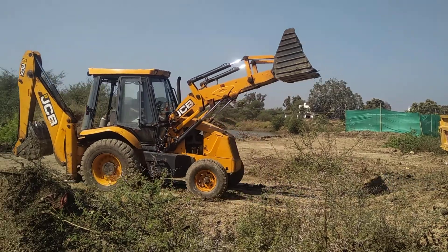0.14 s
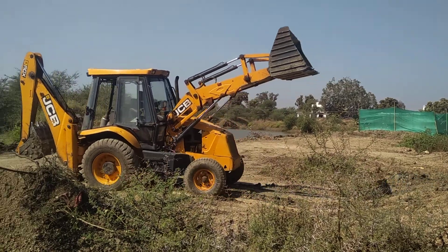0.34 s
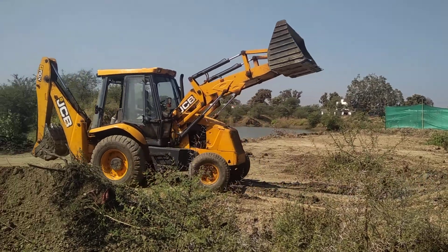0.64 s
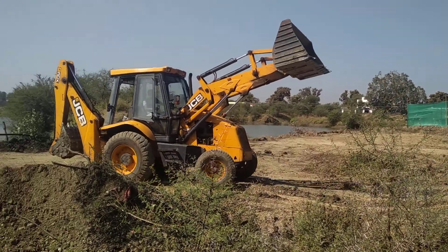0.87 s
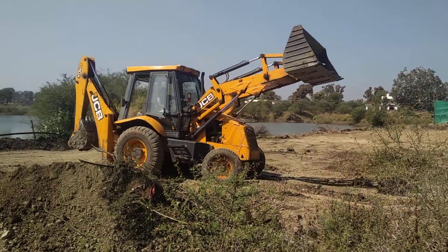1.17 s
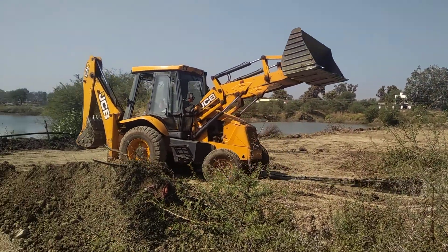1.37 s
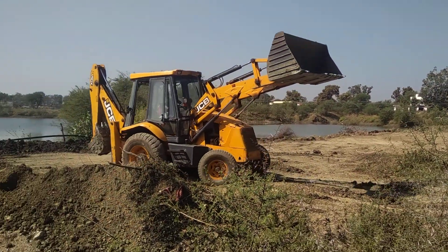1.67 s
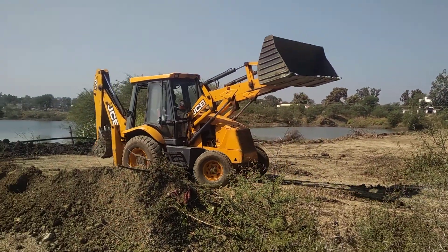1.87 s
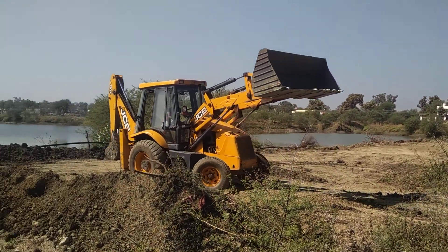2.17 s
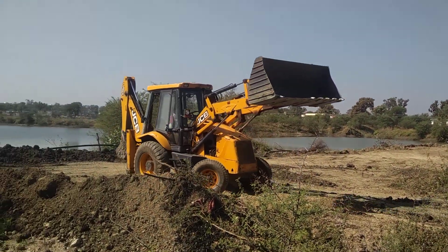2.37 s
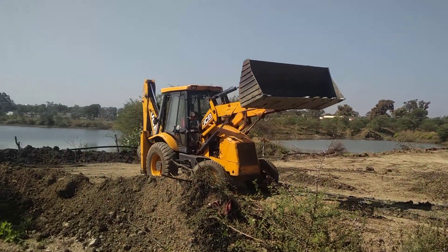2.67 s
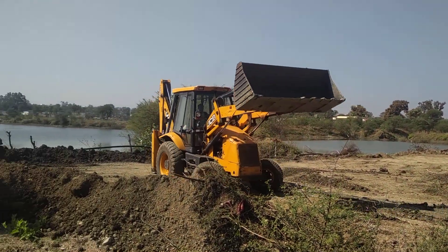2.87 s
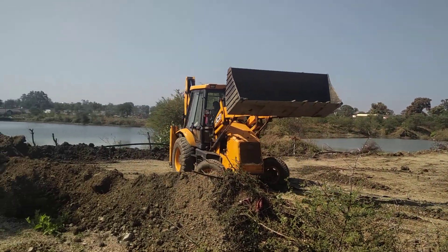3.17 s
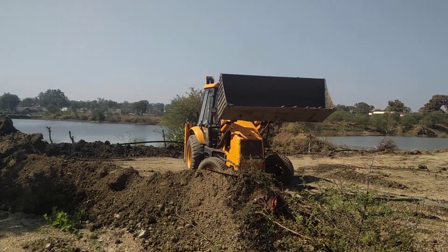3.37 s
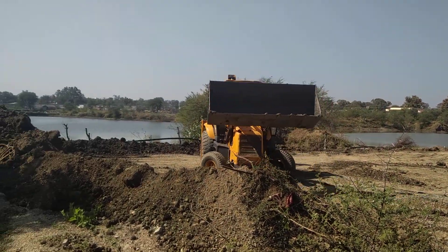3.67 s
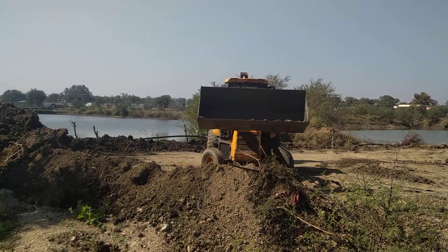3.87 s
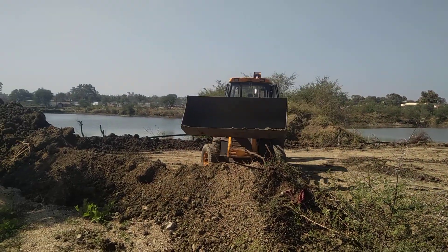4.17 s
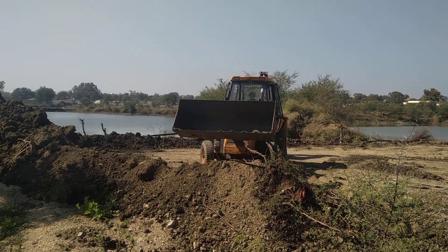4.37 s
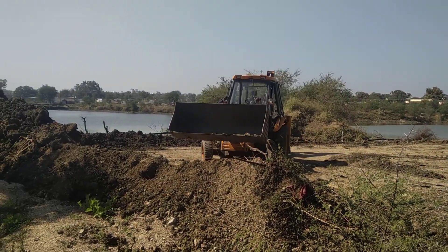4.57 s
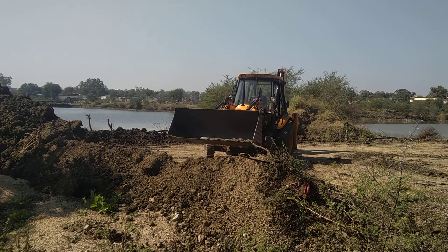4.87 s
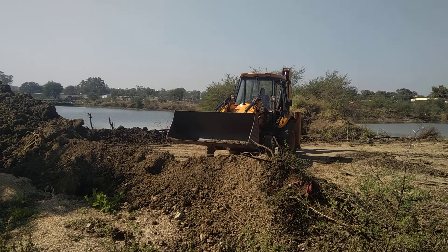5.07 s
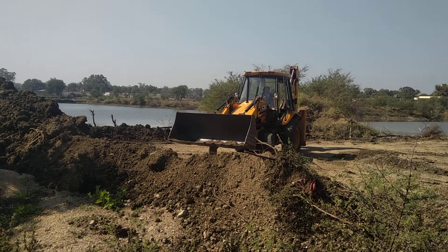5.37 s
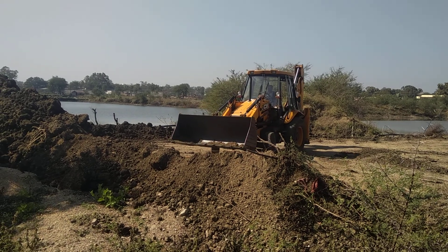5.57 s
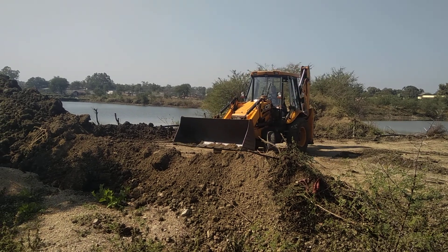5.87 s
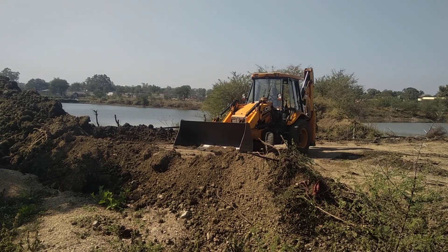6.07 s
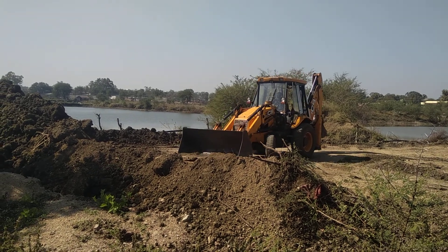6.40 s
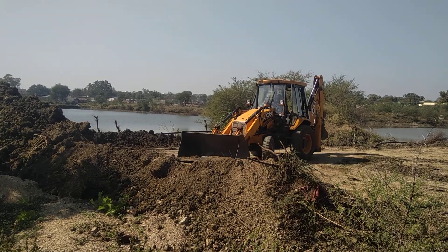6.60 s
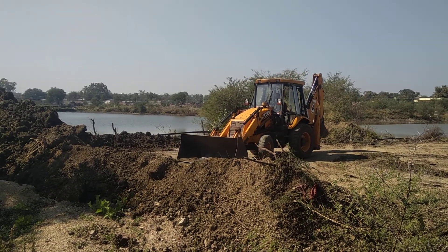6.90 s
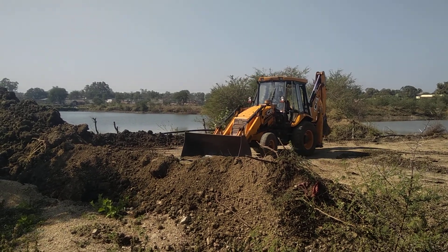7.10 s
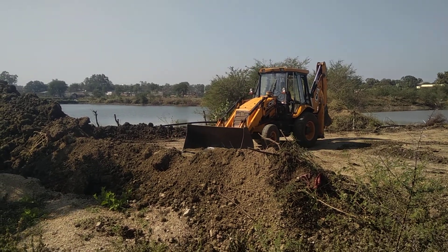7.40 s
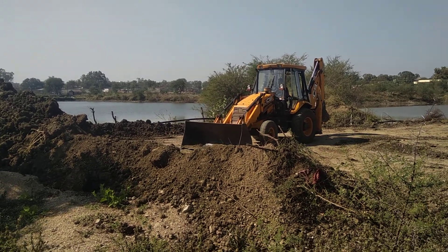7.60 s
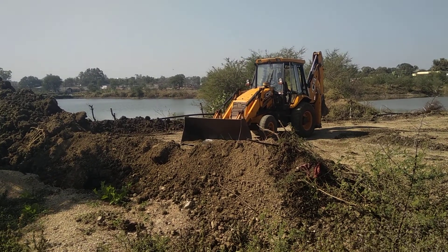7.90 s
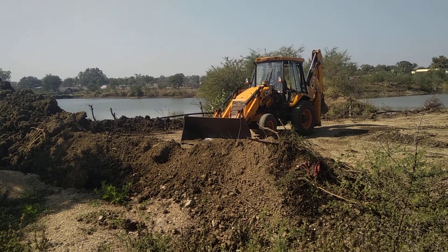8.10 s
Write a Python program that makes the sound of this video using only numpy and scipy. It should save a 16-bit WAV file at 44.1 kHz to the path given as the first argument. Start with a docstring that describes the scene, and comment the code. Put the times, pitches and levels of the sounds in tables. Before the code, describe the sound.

Outdoors, gusts buffet both sides of a stereo microphone while a diesel loader works with a low exhaust hum and rattling knock. A light gear whine falls in pitch and the arm joints clank. The engine rises in one short, harder rev, then slows and settles into a softer throbbing idle, with faint ticks and a quick cluster of clanks near the end.

```python
"""Diesel loader turning away

A four-cylinder loader on open ground works at middle speed, revs once, then sinks to idle.
Exhaust orders and the cooling fan hum below; each firing knocks through block and panels.
Hard firings crack in the treble during the rev; faint ticks follow later.
The drive gear whines briefly and the linkage clanks.
Wind buffets the two microphone ports, each on its own."""
import sys
import numpy as np
from scipy import signal
from scipy.fft import rfft, irfft
from scipy.io import wavfile

SR = 44100
rng = np.random.default_rng(int(sys.argv[2]) if len(sys.argv) > 2 else 0)


def file_out(sig):
    """Save sig as 16-bit WAV at sys.argv[1]."""
    # one column per channel
    cols = np.atleast_2d(sig).T
    # limit, then scale
    lim = np.clip(cols, -1, 1)
    pcm = np.round(lim * 32767).astype(np.int16)
    wavfile.write(sys.argv[1], SR, pcm)


N = 363825

# engine level with load and distance: t/s, knock/dB, exhaust over knock/dB
ENGINE_LEVEL = [(0, -23.5, -2.5), (.5, -25, -3), (1.2, -24, -2.5), (1.7, -24, -0.5), (2.53, -23.5, -1.5),
                (2.64, -20, 0.5), (3.0, -21.5, 1), (3.3, -23, 2.5), (3.68, -26.5, 0.5), (3.82, -28.5, -1.5),
                (4.25, -30.5, -2.5), (4.78, -36, -2.5), (5.5, -35, -2), (6.1, -36.5, -2), (7.0, -34.5, -5),
                (7.55, -35, -4.5), (7.85, -37.5, -10), (8.25, -36, -6)]
# below pipe resonance the first order runs ahead: firing rate/Hz, its lead/cycles, knock lead/cycles
PHASE_LEAD = [(29, .5, .27), (34, .36, .29), (38, .17, .31), (43.5, 0, .33)]
# engine tone by stage (working, throttle bite, rev, idle), changing with load and facing: t/s, stage 0-6
TONE_STAGE = [(0, 0), (.35, 0), (.65, 1), (1.65, 1), (1.9, 2), (2.5, 2), (2.63, 3), (2.8, 3), (2.92, 4),
              (3.5, 4), (4.1, 5), (5.3, 5), (6.2, 6), (8.25, 6)]


def amp(db):
    """dB to gain."""
    return 10 ** (np.asarray(db) / 20)


def unit(x):
    """Scale to rms 1."""
    return x / np.sqrt(np.mean(x ** 2) + 1e-20)


def in_time(rows):
    """Columns of a time table, one value per sample."""
    t_s, *columns = np.transpose(rows)
    return [np.interp(np.arange(N) / SR, t_s, c) for c in columns]


def at_hz(points, hz):
    """Read a table on a log-frequency axis."""
    f_hz, values = np.transpose(points)
    return np.interp(np.log(hz), np.log(np.maximum(f_hz, 1)), values)


def drift(rate_hz):
    """Slow random wander, spread about 1."""
    knots = rng.standard_normal(400)
    return 1.2 * np.interp(np.arange(N) / SR * rate_hz * 2, np.arange(400), knots)


def tone(cycles, rms_db):
    """Sine from a phase in cycles."""
    return np.sqrt(2) * amp(rms_db) * np.sin(2 * np.pi * cycles)


def place(out, burst, t_s, peak_db):
    """Add a stereo burst at a given peak level."""
    i = round(t_s * SR)
    out[:, i:i + burst.shape[1]] += amp(peak_db) * burst / np.abs(burst).max()


def resonate(excite, modes):
    """Parallel resonances (f/Hz, width/Hz, level/dB), each driven by excite(f); rms 1."""
    out = 0
    for hz, width_hz, db in modes:
        r = np.exp(-np.pi * width_hz / SR)
        gain = (1 - r * r) / 2
        section = [gain, 0, -gain, 1, -2 * r * np.cos(2 * np.pi * hz / SR), r * r]
        out = out + amp(db) * signal.sosfilt([section, section], excite(hz))
    return unit(out)


def port_noise(hz):
    """White noise at two ports, as alike as they are at this pitch."""
    # f/Hz, left-right correlation
    likeness = [(60, 1), (150, 1), (380, 0.99), (950, 0.51), (2380, 0.47), (5980, 0.15), (15000, 0.065)]
    mid, side = rng.standard_normal((2, N))
    alike = at_hz(likeness, hz)
    return np.sqrt(1 + alike) * mid + np.sqrt(1 - alike) * side * [[1], [-1]]


def bands(spectrum, gate):
    """Half-octave noise bands, each gated before its filter; rms 1."""
    low_hz, high_hz = spectrum[0][0], spectrum[-1][0]
    edges_hz = np.geomspace(low_hz, high_hz, int(2 * np.log2(high_hz / low_hz)) + 2)
    out = 0
    for a, b in zip(edges_hz, edges_hz[1:]):
        hz = np.sqrt(a * b)
        band = signal.butter(2, [a, b], "band", fs=SR, output="sos")
        out = out + amp(at_hz(spectrum, hz)) * signal.sosfilt(band, port_noise(hz) * gate())
    return unit(out)


def stage_db(source):
    """Level offset of one source, changing with load and facing."""
    # row per stage: fan/dB, rattle/dB, roar/dB, upper exhaust orders/dB, timing gear/dB
    offsets = [(-6.5, -7.5, -3, 0.5, -15), (-6.5, -7, -5, -4.5, -18), (-13, -8, -3.5, -0.5, -14.5),
               (-34, -9, -4, -0.5, -20), (-18.5, -8, -1, -9, -29), (-7.5, -13.5, -3.5, -8, -42),
               (-3.5, -8.5, -6.5, -3, -29)]
    column = ["fan", "rattle", "roar", "upper orders", "timing gear"].index(source)
    (stage,) = in_time(TONE_STAGE)
    return np.interp(stage, np.arange(len(offsets)), np.array(offsets)[:, column])


def wind(flutters=58, gust_s=.05):
    """Lumpy rumble, its own at each port, and short buffets that hit one port."""
    # t/s, level/dB
    rumble_level = [(0, -32), (1, -30.5), (1.9, -42.5), (2.7, -22), (4, -40.5), (5.5, -40.5), (7.5, -29.5),
                    (7.85, -38), (8.25, -32.5)]
    # strong buffets: t/s, level/dB, top f/Hz, port (0 left, 1 right)
    gusts = [(0.215, -13, 64, 1), (0.52, -19, 139, 1), (0.865, -10, 71, 1), (1.08, -9, 110, 1),
             (1.556, -15, 215, 1), (1.675, -11, 88.4, 1), (5.199, -21.5, 120, 0), (5.928, -16.5, 270, 0),
             (6.153, -21, 89, 0), (6.24, -22, 204, 0), (6.35, -16.5, 211, 0), (6.429, -17.5, 150, 1),
             (6.52, -17, 150, 1), (6.811, -15, 128, 1), (7.136, -11.5, 71.3, 1), (7.221, -27, 422, 1),
             (7.26, -19.5, 305, 1), (7.348, -13, 334, 0), (7.373, -20.5, 413, 0), (7.634, -20, 179, 0),
             (7.67, -15.5, 73, 0), (7.737, -14, 76, 0), (7.971, -19, 190, 0), (8.112, -17.5, 217, 0),
             (8.167, -24, 170, 1)]
    low = np.r_[signal.butter(1, [14, 80], "band", fs=SR, output="sos"),
                signal.butter(2, 260, fs=SR, output="sos")]
    out = unit(signal.sosfilt(low, rng.standard_normal((2, N + 9000)))[:, 9000:])
    (rumble_db,) = in_time(rumble_level)
    out *= amp(rumble_db + 4.85 * np.array([drift(8.3), drift(6.8)]))
    small = [(when * N / SR, rumble_db[int(when * N)] + 4 + 8 * force, 150 * (.194 + pitch), port)
             for when, force, pitch, port in rng.random((flutters, 4))]
    for t_s, db, top_hz, port in gusts + small:
        band = signal.butter(2, [max(.25 * top_hz, 15), max(top_hz, 30)], "band", fs=SR, output="sos")
        n = round(gust_s * SR * min(150 / top_hz, 1) ** .85)   # brighter is shorter
        puff = unit(signal.sosfilt(band, rng.standard_normal(9000))[-n:]) * np.hanning(n)
        i = max(round(t_s * SR) - n // 2, 0)
        out[int(round(port)), i:i + n] += amp(db) * puff[:N - i]
    return out


def drive_gear(play_cycles=.3):
    """The gear whines with travel speed; tooth play wobbles its phase."""
    # backing round, then creeping forward: t/s, f/Hz, level/dB
    whine = [(0, 441, -36), (.25, 460, -41), (.55, 440, -39), (.75, 418, -33), (.9, 432, -48),
             (1.1, 437, -41), (1.5, 299, -38), (1.75, 287, -41), (1.9, 290, -63), (4.7, 303, -53),
             (4.85, 306, -50.5), (5.25, 257.3, -45.5), (5.8, 252, -49), (5.95, 250, -61)]
    hz, db = in_time(whine)
    return tone(np.cumsum(hz) / SR + play_cycles * drift(15), db + 2 * drift(22))


def linkage(hit_db=6):
    """Pins knock in their bores: a blow, then ragged ringing noise."""
    # t/s, peak/dB, centre f/Hz, treble/dB, t60/s
    clanks = [(0.298, -11, 1140, -8, 0.27), (1.264, -12, 1130, -19, 0.041), (2.645, -11, 337, -22, 0.23),
              (3.943, -16.5, 1110, -22, 0.13), (3.994, -19, 1230, -12, 0.096),
              (6.9361, -11.5, 2360, -15.5, 0.16), (6.943, -14, 2270, -12, 0.39),
              (6.988, -17.5, 1280, -10, 0.16), (7.01, -35, 970, -3, 0.081)]
    out = np.zeros((2, N))
    t = np.arange(round(.2 * SR)) / SR
    hit = np.minimum(t / .00026, 1) * (1 + amp(hit_db) * np.exp(-t / .0015))
    for t_s, db, centre_hz, treble_db, t60_s in clanks:
        dying = hit * amp(-60 * t / max(t60_s, .005))
        excite = lambda hz: (rng.standard_normal(len(t)) + .5 * rng.standard_normal((2, len(t)))) * dying
        modes = [(centre_hz, 750, 0), (300, 300, -3), (800, 500, -7),
                 (3500, 900, treble_db + 3), (5000, 2500, treble_db - 7)]
        place(out, resonate(excite, modes), t_s, db)
    return out


def cracks_and_ticks():
    """Hard firings crack in the treble during the rev; faint ticks follow later."""
    # t/s, peak/dB
    peaks = [(2.6516, -16), (2.675, -14), (2.828, -13), (2.99, -10), (3.0106, -9), (3.033, -15),
             (3.153, -14.5), (4.2805, -27), (4.335, -26.5), (4.3444, -35), (4.5094, -36), (4.5659, -37),
             (4.6508, -36), (7.347, -30.5), (7.3896, -32), (8.0994, -36)]
    out = np.zeros((2, N))
    t = np.arange(1500) / SR
    bright = signal.butter(2, [6500, 12500], "band", fs=SR, output="sos")
    shape = amp(-60 * t / .017) * np.minimum(t / .013, 1)
    for t_s, db in peaks:
        place(out, signal.sosfilt(bright, rng.standard_normal((2, len(t))) * shape), t_s, db)
    return out


def exhaust(firing_hz, cycles, throb_db=4, idle_odd_db=-6.5):
    """Eight orders in step: a slow rise and sharp drop per firing, uneven at idle."""
    # tail pipe over the ground: f/Hz, gain/dB
    pipe = [(24, 9.5), (36, 10), (48, 9), (56, 7.5), (78, -3.5), (96, 1.5), (125, -3), (147, -8),
            (174, -13), (188, -4.5), (215, -6), (226, -14.5), (290, -24.5), (350, -22)]
    knock_db, over_db = in_time(ENGINE_LEVEL)
    idle = np.clip((33 - firing_hz) / 5, 0, 1)
    level_db = knock_db + over_db + throb_db * idle * drift(8.4)
    rate_hz, first_lead, _ = np.transpose(PHASE_LEAD)
    out = 0
    for order in range(1, 9):
        db = level_db + at_hz(pipe, order * firing_hz) + .86 * drift(3)
        db += (order > 4) * stage_db("upper orders") + (order in (1, 3)) * idle_odd_db * idle
        lead = .61 + (order == 1) * np.interp(firing_hz, rate_hz, first_lead)
        out = out + tone(order * cycles + lead, db)
    return out


def timing_gear(cycles, teeth_per_firing=20, play_cycles=.35):
    """Mesh tone, wobbling with the play between the teeth."""
    knock_db, _ = in_time(ENGINE_LEVEL)
    mesh = teeth_per_firing * cycles + play_cycles * drift(12)
    return tone(mesh, knock_db + stage_db("timing gear") + 4 * drift(11))


def fan(firing_hz, cycles, blades_per_firing=3.6, db_per_hz=.28):
    """Blade-pass tone, growing with engine speed."""
    knock_db, _ = in_time(ENGINE_LEVEL)
    db = knock_db + stage_db("fan") + db_per_hz * (firing_hz - 40) + 2 * drift(2.4)
    return tone(blades_per_firing * cycles, db)


def combustion(firing_hz, cycles, uneven_db=1.6, blow_db=8, block_db=7, bite_db=21.5):
    """Each firing strikes the block and sets off noise bursts, over steady valve clatter."""
    # noise power share in bursts: t/s, rattle and roar (0-1), block and panels (0-1)
    burst_share = [(0, .3, .36), (2.0, .33, .4), (2.5, .42, .48), (2.62, .68, .72), (2.85, .6, .65),
                   (3.1, .44, .45), (3.5, .28, .25), (4.5, .15, .22), (5.2, .22, .36), (5.9, .22, .4),
                   (6.4, .22, .48), (7.7, .2, .46), (7.9, .12, .15), (8.25, .12, .2)]
    # block resonances, one list per tone stage: f/Hz, width/Hz, level/dB
    block_modes = [
        [(533, 44, -3), (766, 160, 1.5), (1230, 350, -1.5), (1370, 110, -14), (1935, 360, -2.5),
         (2560, 640, -4), (2980, 450, -13)],
        [(553, 110, -9.5), (786, 440, -7.5), (1157, 100, 0.5), (1356, 200, -6.5), (1863, 350, -5.5),
         (2550, 590, -8), (3050, 350, -14.5)],
        [(550, 170, -7.5), (810, 460, -6.5), (1274, 180, 1.5), (1130, 94, -2), (1870, 590, -5.5),
         (2530, 370, -2), (3050, 920, -13)],
        [(610, 110, -3), (790, 84, 6.5), (1265, 220, 4), (1660, 320, 3.5), (2060, 160, -8), (2625, 250, 0.5),
         (3100, 450, -24)],
        [(620, 125, 1), (806, 120, 5), (1240, 400, 2), (1615, 200, -3.5), (1915, 230, 1), (2550, 710, -2),
         (3170, 1000, -11.5)],
        [(612, 160, -25), (735, 113, -4), (1110, 330, -8.5), (958, 41, -9), (1815, 340, -12), (2564, 400, -12),
         (3100, 820, -20)],
        [(631, 140, -16.5), (760, 140, -4), (1265, 550, -11.5), (974, 84, -1), (1738, 183, -8.5),
         (2345, 620, -10.5), (2824, 730, -11.5)],
    ]
    # injector ring: f/Hz, width/Hz, level/dB
    injector_modes = [(6180, 1200, 9), (9090, 3000, 2), (12100, 660, 1)]
    # noise of panels, treble rattle and exhaust roar: f/Hz, relative density/dB
    panel_spectrum = [(420, -30), (620, -1), (850, -7), (1200, -6.5), (1550, -7.5), (2100, -8), (2600, -5),
                      (3900, -23.5), (4600, -6.5), (6000, -32)]
    rattle_spectrum = [(2060, -58), (3500, 11.5), (3970, -4), (4820, 6), (6310, 5.5), (7480, -1),
                       (9250, -0.5), (12200, -2), (13600, -10), (15100, -25), (15700, -32)]
    roar_spectrum = [(30, 7.5), (70, -6.5), (150, -1.5), (280, -9.5), (400, -1.5), (520, -28.5),
                     (700, -7.5)]
    rattle_share, knock_share = in_time(burst_share)
    rate_hz, _, knock_lead = np.transpose(PHASE_LEAD)
    knock_cycles = cycles + np.interp(firing_hz, rate_hz, knock_lead)
    firing, phase = knock_cycles.astype(int), knock_cycles % 1
    strikes = np.flatnonzero(np.diff(np.floor(knock_cycles - .2))) + 1
    per_firing = lambda: rng.uniform(-1, 1, 400)
    firing_db = uneven_db * per_firing()   # common to all bursts and blows

    def gate(share, fall=3, own_db=1.5, steady=.85):
        """Burst that swells and dies within the cycle, over a steady floor."""
        strength = amp(firing_db + own_db * per_firing())[firing]
        burst = unit(strength * phase ** 3 * np.exp(-3 * fall * phase))
        return np.sqrt(steady * (1 - share) + share * burst ** 2)

    def blows(share, scatter_s):
        """One click per firing, a little early or late."""
        clicks, n = np.zeros(N), len(strikes)
        at = np.clip(strikes + (scatter_s * SR * per_firing()[:n]).astype(int), 0, N - 1)
        clicks[at] = amp(firing_db[firing[strikes]] + 2.5 * per_firing()[:n])
        return amp(blow_db) * unit(clicks) * share

    soft = signal.butter(1, 1100, fs=SR, output="sos")
    drives = []
    for hz, _, _ in block_modes[1]:   # the blow reaches each resonance at its own moment
        clatter = port_noise(hz) * gate(knock_share, fall=2.65, own_db=3, steady=.6)
        push = signal.sosfilt(soft, blows(knock_share, scatter_s=.09 / firing_hz[strikes]) + 1e-18)
        drives.append((clatter + push) * amp(.7 * drift(5)))
    (stage,) = in_time(TONE_STAGE)
    block = np.zeros((2, N))
    for k, modes in enumerate(block_modes):
        crossfade = np.sqrt(np.clip(1 - np.abs(stage - k), 0, 1))
        heard, drive = crossfade > 0, iter(drives)
        block[:, heard] += crossfade[heard] * resonate(lambda hz: next(drive)[:, heard], modes)
    panels = bands(panel_spectrum, lambda: gate(knock_share))
    knock = unit(panels + amp(block_db) * block)

    def injection(hz):
        """Short noise burst and click that ring an injector."""
        burst = port_noise(hz) * gate(rattle_share, fall=5.8)
        return burst + amp(-12) * blows(rattle_share, scatter_s=.0019)

    rattle = bands(rattle_spectrum, lambda: gate(rattle_share, fall=3.14, own_db=16.5))
    ring = amp(-11 + bite_db * rattle_share) * resonate(injection, injector_modes)
    rattle = amp(stage_db("rattle")) * unit(rattle + ring)
    roar = amp(stage_db("roar")) * bands(roar_spectrum, lambda: gate(rattle_share, fall=2.46))
    knock_db, _ = in_time(ENGINE_LEVEL)
    return amp(knock_db) * (knock + rattle + roar)


def at_ports(machine, left_lag_s=4e-5):
    """The left port hears more treble, a moment later."""
    # f/Hz, left over right/dB
    balance = [(60, -1.5), (95, -0.5), (150, 0), (240, -2.5), (380, 2), (600, -3.5), (950, 1.5), (1500, -1),
               (2380, 12.5), (3770, 3), (5980, 10), (9470, 11.5), (15000, 3)]
    hz = np.maximum(np.fft.rfftfreq(N, 1 / SR), 20)
    tilt = amp(at_hz(balance, hz) / 2 * np.array([[1], [-1]]))
    delay = np.exp(-2j * np.pi * hz * left_lag_s * np.array([[1], [0]]))
    return irfft(rfft(machine) * tilt / tilt.mean(axis=0) * delay, N)


def scene():
    """Machine at both ports, wind at each."""
    # engine speed: t/s, firing rate/Hz
    firing_rate = [(0.0, 45.29), (0.7, 43.75), (1.45, 43.37), (2.2, 42.98), (2.52, 42.19), (2.62, 42.37),
                   (2.75, 47.15), (2.87, 48.12), (3.05, 49.37), (3.3, 47.97), (3.65, 45.8), (3.82, 42.01),
                   (4.05, 37.79), (4.3, 34.32), (4.5, 34.6), (4.7, 29.41), (4.9, 28.59), (5.3, 27.97),
                   (5.9, 27.34), (6.4, 26.15), (7.2, 24.58), (7.75, 26.06), (8.25, 24.63)]
    (firing_hz,) = in_time(firing_rate)
    cycles = np.cumsum(firing_hz) / SR + .33
    hum = exhaust(firing_hz, cycles) + timing_gear(cycles) + fan(firing_hz, cycles)
    machine = hum + drive_gear() + combustion(firing_hz, cycles) + linkage() + cracks_and_ticks()
    return at_ports(machine) + wind()


def record(dry):
    """Soft peak limit, then a steep low-pass."""
    ceiling, stop_hz = .97, 15800
    soft = dry / (1 + np.abs(dry / ceiling) ** 6) ** (1 / 6)
    return signal.sosfilt(signal.cheby2(12, 70, stop_hz, fs=SR, output="sos"), soft)


dry = scene()
out = record(dry)
file_out(out)
```